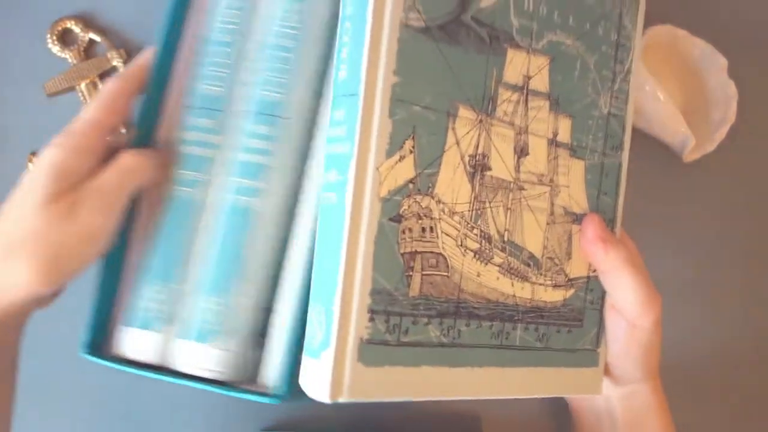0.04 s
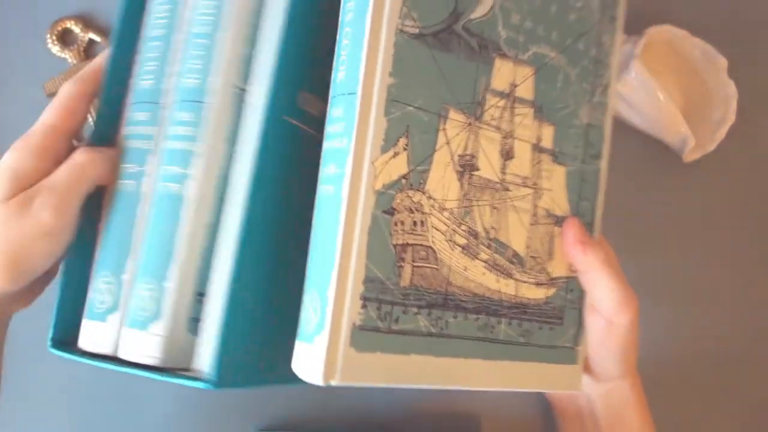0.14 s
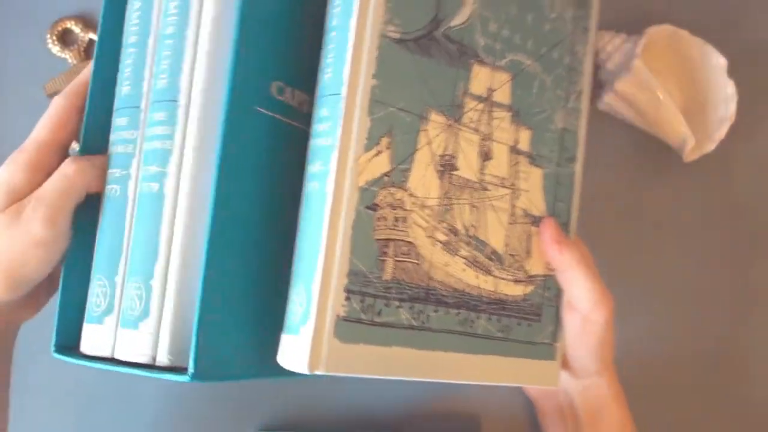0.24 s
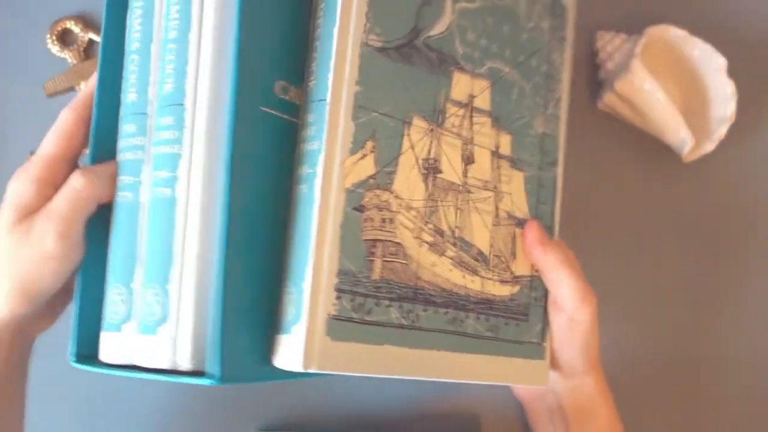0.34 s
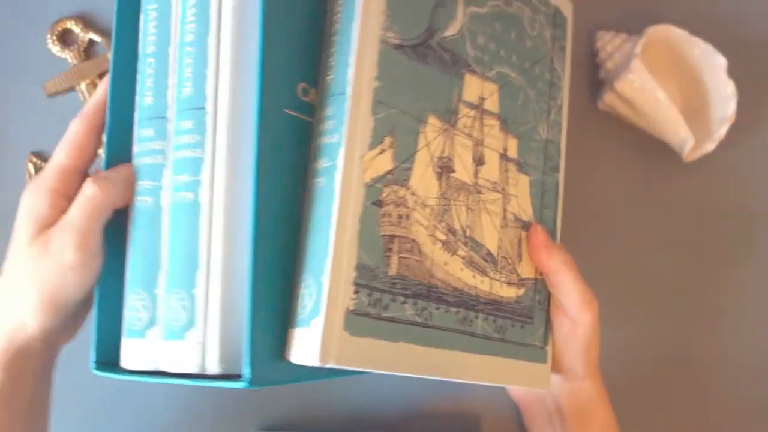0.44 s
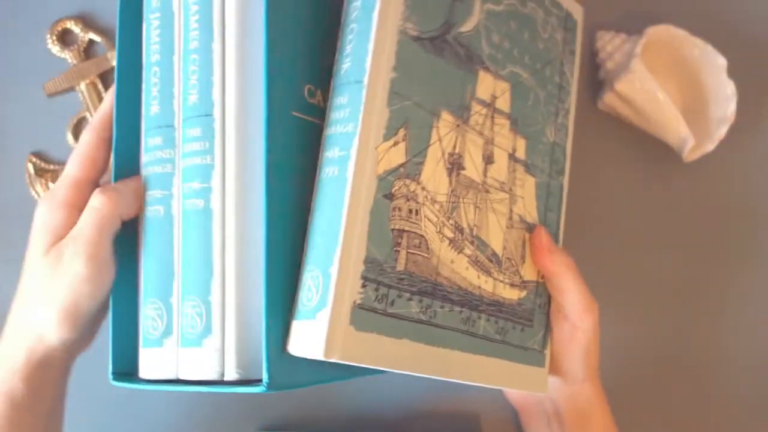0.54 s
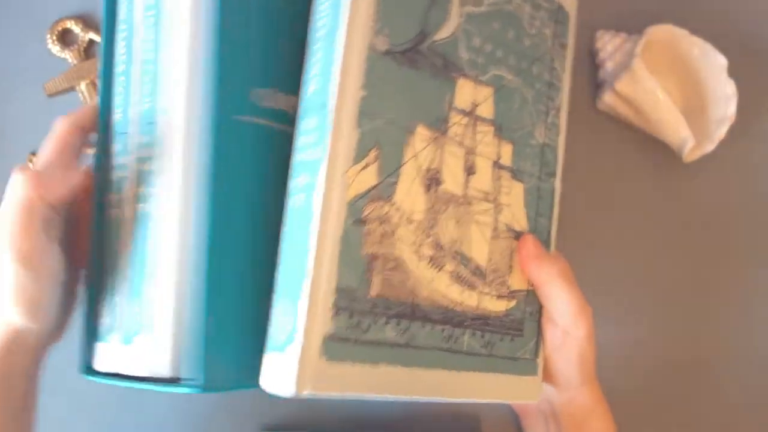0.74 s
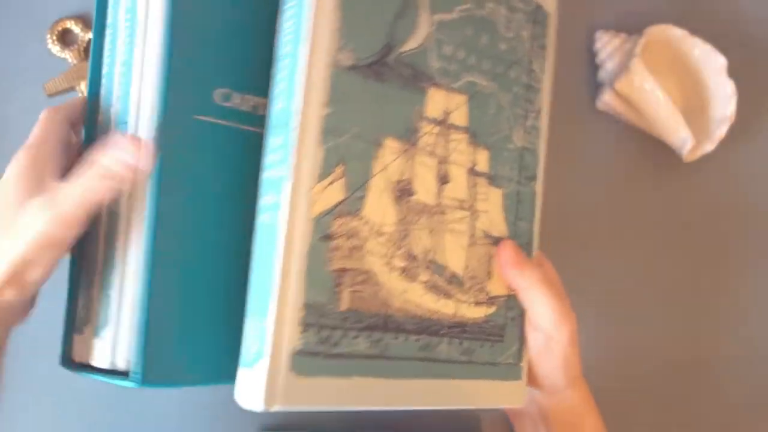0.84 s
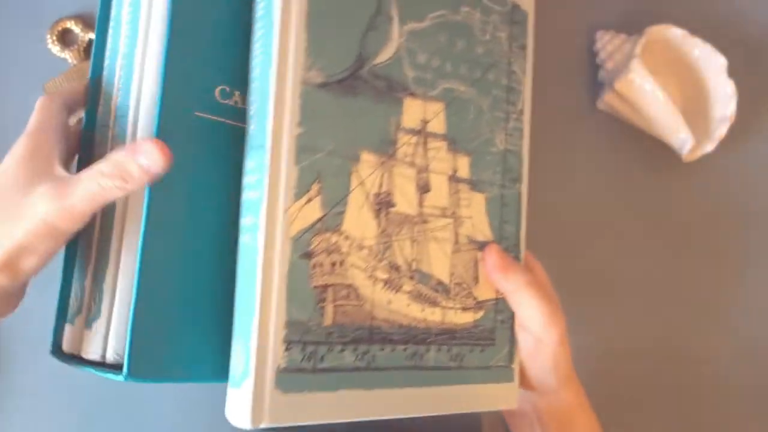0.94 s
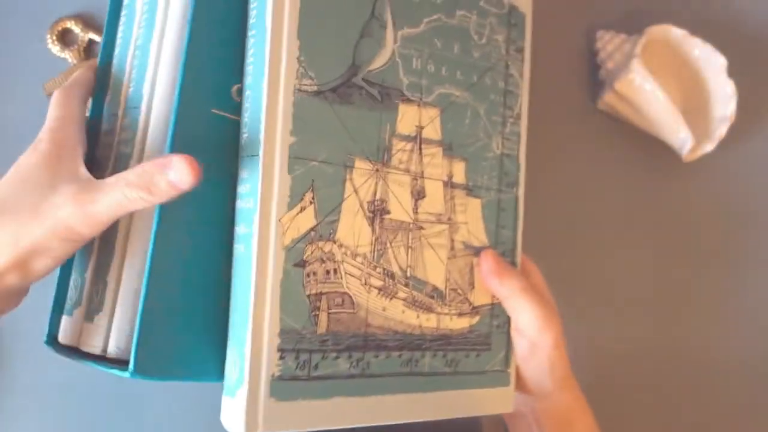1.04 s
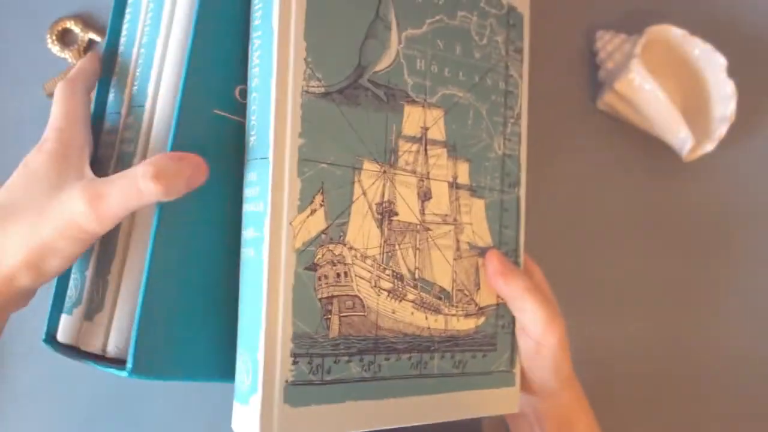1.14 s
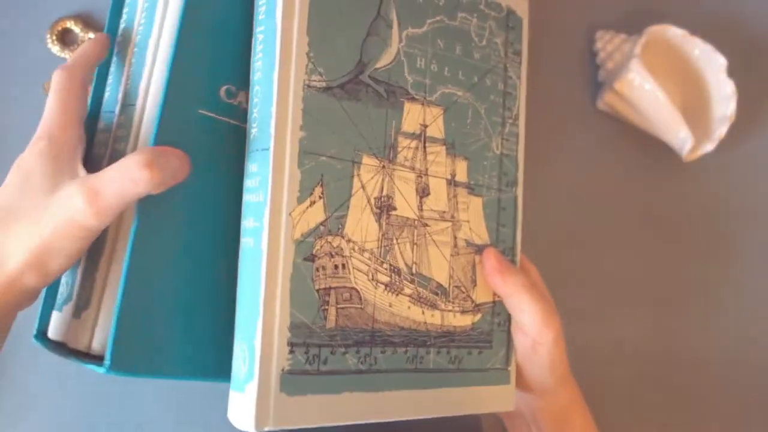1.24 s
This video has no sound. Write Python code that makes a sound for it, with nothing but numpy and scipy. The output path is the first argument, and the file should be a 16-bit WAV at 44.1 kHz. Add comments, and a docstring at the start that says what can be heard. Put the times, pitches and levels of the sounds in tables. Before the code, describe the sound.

Books slide and knock in a cardboard slipcase on a table, with dull thumps.

```python
"""Books slide and tip in a cardboard slipcase that is shifted on a table, in a quiet room.
Stick-slip friction of cloth on card hisses and makes the table rumble. Each impact gives a dull knock
and excites the damped modes of the table top, which sways and booms. A small hard object jingles
faintly, fingertips brush the cloth, and at the end a fingernail ticks on the case."""
import sys
import numpy as np
from scipy import signal
from scipy.fft import rfft, irfft
from scipy.io import wavfile
from scipy.ndimage import uniform_filter1d

SR = 44100
rng = np.random.default_rng(int(sys.argv[2]) if len(sys.argv) > 2 else 0)


def dump_mix(stems):
    """Bounce the given channels to the path in sys.argv[1] as a 16-bit WAV at rate SR."""
    frames = np.atleast_2d(stems).T  # one column per channel
    limited = np.clip(frames, -1, 1)  # hard clip at full scale
    pcm = np.round(limited * 32767).astype(np.int16)
    wavfile.write(sys.argv[1], SR, pcm)


N = 57330
T = np.arange(N) / SR

# impacts of books and case: t/s, knock level/dB, knock f/Hz, crush level/dB, crush tilt/(dB/octave),
# contact time/s, thud level/dB, table boom level/dB, table sway level/dB
IMPACTS = [(0.308, -40, 406, -52.5, 1, 0.0023, -49.5, -20, -14),
           (0.341, -52, 315, -50.5, -0.5, 0.007, -45.5, -45, -22.5),
           (0.677, -28.5, 383.4, -45.5, 2.5, 0.0013, -59, -17.5, -21),
           (0.684, -46.5, 1132, -48, 0.5, 0.001, -50, -28.5, -14),
           (0.709, -48, 560, -55, -2.5, 0.0011, -50.5, -21, -48),
           (0.729, -39.5, 371, -57.5, -2.5, 0.002, -49.5, -42.5, -31),
           (0.853, -48, 835, -42.5, -10.5, 0.001, -59, -31, -41),
           (0.877, -48.5, 772, -44.5, -6, 0.00066, -63, -28, -64),
           (0.916, -45, 469, -48.5, -9, 0.00057, -60.5, -37, -41.5),
           (0.9844, -41, 494, -46.5, -1.5, 0.0005, -48.5, -31.5, -23)]
# friction spectrum of cloth on card: f/Hz, relative level/dB
FRICTION_SPECTRUM = [(150, -30.5), (280, -7.5), (420, 5), (600, -3), (830, -4), (1050, -17.5),
                     (1600, -12.5), (2400, -23), (4500, -23.5), (5000, -32), (7300, -35.5), (9500, -44.5),
                     (16000, -50)]


def sliding():
    """Stick-slip friction: tiny slips of cloth on card hiss in the case and force the table to vibrate."""
    # start t/s, duration/s, rub level/dB, tilt/(dB/octave), rumble level/dB, drone level/dB
    strokes = [(0.039, 0.096, -64, 0, -40, -44.5), (0.111, 0.21, -60, 1, -40.5, -40.5),
               (0.309, 0.12, -61.5, 3, -37.5, -38), (0.422, 0.14, -59, 1, -44.5, -47),
               (0.599, 0.16, -59.5, 1, -42, -47.5), (0.68, 0.18, -67, 2, -36.5, -42),
               (0.833, 0.14, -56.5, -1, -36.5, -36.5), (0.983, 0.062, -56, -1, -33.5, -38.5),
               (1.053, 0.11, -65.5, -4, -42, -50.5), (1.176, 0.3, -67, -1, -57, -55)]
    # forced response of the table top, deep and higher: f/Hz, relative level/dB
    rumble_spectrum = [(15, -27), (32, -6), (55, 8), (74, -1.5), (92, -18), (700, -89)]
    drone_spectrum = [(50, -29), (95, -15.5), (123, 2), (140, -12), (156, -13.5), (190, -32), (900, -88.5)]
    rise_s, fall_s, uneven_db, slip_share = 0.032, 0.07, 0.8, 0.42
    rub, rumble = np.zeros((2, N))
    for start, length, db, tilt_db, rumble_db, drone_db in strokes:
        speed = np.clip((T - start) / rise_s, 0, 1) * np.clip((start + length - T) / fall_s + .5, 0, 1)
        roughness = unit(uniform_filter1d(rng.standard_normal(N), size=700))
        grip = speed * amp(uneven_db * roughness)
        friction = np.sqrt(slip_share) * slips() + np.sqrt(1 - slip_share) * rng.standard_normal(N)
        rub += amp(db) * colour(friction * grip, FRICTION_SPECTRUM, tilt_db)
        rumble += speed * amp(rumble_db) * steady_noise(rumble_spectrum)
        rumble += speed * amp(drone_db) * steady_noise(drone_spectrum)
    return room(rub + rasp() + scuffs(), wet_db=-11.5) + rumble


def rasp():
    """Frequency modulation: narrow resonances of a dragged woven cover rise and sink with its speed."""
    # f/Hz at full speed, width/Hz, level/dB
    weave_bands = [(5570, 300, -77), (6420, 230, -79), (11360, 1300, -88)]
    start_s, length_s, bend = 0.31, 0.26, 0.035
    speed = np.sin(np.pi * np.clip((T - start_s) / length_s, 0, 1))
    glide = 1 + bend * (speed - 1)
    return speed * sum(amp(db) * resonate(slips(), hz * glide, width) for hz, width, db in weave_bands)


def scuffs():
    """Transient friction: the cloth catches in short, gritty bursts of slips."""
    # t/s, level/dB, tilt/(dB/octave)
    catches = [(0.073, -57.5, 1), (0.204, -59.5, 0.5), (0.646, -60, 1)]
    return sum(amp(db) * colour(slips() * gaussian(s, width_s=0.011), FRICTION_SPECTRUM, tilt_db)
               for s, db, tilt_db in catches)


def knocks():
    """Impact excitation: a book knocks the case into ringing, the card crushes and the pages thud."""
    # slipcase: f/Hz, level/dB, T60/s
    case_modes = [(317.3, -16, 0.23), (355.2, -13, 0.19), (430, -15.5, 0.18), (549.3, -9.5, 0.07),
                  (834, -20, 0.14)]
    # crushed card and block of pages: f/Hz, relative level/dB
    crush_spectrum = [(150, -31.5), (350, -3.5), (700, 3), (1150, 0), (3000, -14.5), (8000, -32),
                      (16000, -38)]
    thud_spectrum = [(120, -22.5), (220, -1), (360, 1.5), (520, -11), (900, -23.5), (2500, -55.5)]
    hollow, crush, thud = np.zeros((3, N))
    for s, knock_db, hz, crush_db, tilt_db, contact_s, thud_db, *_ in IMPACTS:
        onset = 1 - np.exp(-T / contact_s)
        # the spot that is hit sets the pitch; the hand damps it
        knock = gaussian(0, width_s=0.011) * np.sin(2 * np.pi * hz * T)
        add(hollow, s, amp(knock_db) * onset * (knock + ring(case_modes, detune=0.011)))
        # a softer contact crushes for longer
        burst = onset * decay(t60=0.031 + 7.1 * contact_s) * rng.standard_normal(N)
        add(crush, s, amp(crush_db) * colour(burst, crush_spectrum, tilt_db))
        add(thud, s, amp(thud_db) * onset * decay(t60=0.32) * steady_noise(thud_spectrum))
    return room(hollow, wet_db=-14) + room(crush, wet_db=-4.5) + thud


def table_top():
    """Modal vibration: after each impact the table's lowest mode sways and the higher ones boom."""
    # f/Hz, level/dB, T60/s, lag/s, rise time/s
    table_modes = [(31.18, -5, 0.55, 0.015, 0.037), (56.9, -1.5, 0.16, 0.01, 0.0089),
                   (113.6, 2, 0.16, 0.0051, 0.0069), (152.5, -11, 0.14, 0.008, 0.018)]
    out = np.zeros(N)
    for k, (hz, db, t60, lag, rise) in enumerate(table_modes):
        swell = 1 - gaussian(0, rise)
        mode = amp(db) * swell * decay(t60) * np.sin(2 * np.pi * hz * T)
        for s, *_, boom_db, sway_db in IMPACTS:
            add(out, s + lag, amp(boom_db if k else sway_db) * mode)
    return out


def fingernail():
    """Impulse response: a nail snaps over the case's edge in ringing ticks, and the room reverberates."""
    # t/s, snap level/dB, ring level/dB
    ticks = [(1.2058, -44, -73), (1.2122, -32.5, -55.5), (1.2141, -35, -65), (1.2242, -41, -65),
             (1.233, -42, -63)]
    # f/Hz, relative level/dB
    snap_spectrum = [(200, -6.5), (2200, -2), (4500, -5.5), (8200, -5), (10300, -20.5), (12000, -12.5),
                     (15500, -14)]
    # f/Hz, level/dB, T60/s
    nail_modes = [(5873, -6, 0.031), (6900, -6, 0.023), (7900, -3, 0.022)]
    out = np.zeros(N)
    for s, snap_db, ring_db in ticks:
        snap = decay(t60=0.0029) * rng.standard_normal(N)
        add(out, s, amp(snap_db) * colour(snap / np.linalg.norm(snap), snap_spectrum))
        add(out, s, amp(ring_db) * ring(nail_modes, detune=0.012))
    tail = decay(t60=0.3) * rng.standard_normal(N)
    return reverberate(out, tail, wet_db=0.5)


def jingle():
    """Contact chatter: jolted by knocks, a small hard object rattles in two high resonances."""
    # t/s, level/dB, T60/s
    rattles = [(0.673, -58, 0.032), (0.985, -67.5, 0.12), (1.024, -76.5, 0.095)]
    # f/Hz, width/Hz, relative level/dB
    resonances = [(7270, 500, -7), (7860, 500, -1.5)]
    out = np.zeros(N)
    for s, db, t60 in rattles:
        chatter = sum(amp(db + part_db) * resonate(slips(), hz, width) for hz, width, part_db in resonances)
        add(out, s, decay(t60) * chatter)
    return room(out, wet_db=-5.5)


def fingertips():
    """Light friction: skin brushes the cloth with a thin, airy hiss."""
    # t/s, level/dB
    brushes = [(0.654, -82.5), (0.806, -84)]
    touch = sum(amp(db) * gaussian(s, width_s=0.03) for s, db in brushes)
    return touch * noise_band(hz=12600, width=4200)


def hush():
    """Ambient noise: the steady, low background of the room."""
    # f/Hz, relative level/dB
    air_spectrum = [(15, -13), (55, 0.5), (200, -13.5), (420, -18.5), (1000, -37), (8000, -47.5),
                    (16000, -62)]
    return amp(-62) * unit(colour(rng.standard_normal(N), air_spectrum))


def room(x, wet_db, gap_s=0.0055):
    """Diffuse reverberation: the treble of the tail dies sooner than the bass."""
    # f/Hz, T60/s
    decay_times = [(150, 0.37), (12000, 0.17)]
    hz, t, bands = signal.stft(rng.standard_normal(N) * (T > gap_s), SR, nperseg=256)
    damping = np.exp(-np.log(1000) * t / read(decay_times, hz)[:, None])
    tail = signal.istft(bands * damping, SR)[1][:N]
    return reverberate(x, tail, wet_db)


def reverberate(x, tail, wet_db):
    """Convolution with a tail of unit energy, added to the direct sound."""
    return x + amp(wet_db) * signal.fftconvolve(x, tail / np.linalg.norm(tail))[:N]


def slips(per_s=2000, spread_db=2.5):
    """Shot noise: randomly timed slips of uneven size, rms 1."""
    sizes = amp(spread_db * np.minimum(rng.exponential(1, N), 4)) * rng.choice([-1, 1], N)
    return unit(sizes * (rng.random(N) < per_s / SR))


def steady_noise(spectrum):
    """Coloured noise held at an even strength by its running rms."""
    noise = colour(rng.standard_normal(N), spectrum)
    return noise / np.sqrt(uniform_filter1d(noise ** 2, size=1800) + 1e-9)


def noise_band(hz, width):
    """Band-pass noise, rms 1."""
    f = np.fft.rfftfreq(N, 1 / SR)
    return unit(irfft(rfft(rng.standard_normal(N)) / (1 + ((f - hz) / (width / 2)) ** 2), N))


def ring(modes, detune):
    """Free vibration of damped modes, slightly retuned by the grip."""
    return sum(amp(db) * decay(t60) * np.sin(2 * np.pi * hz * (1 + detune * rng.standard_normal()) * T)
               for hz, db, t60 in modes)


def resonate(x, hz, width):
    """Driven resonance at a fixed or gliding frequency, rms 1."""
    carrier = np.exp(2j * np.pi * np.cumsum(hz * np.ones(N)) / SR)
    pole = np.exp(-np.pi * width / SR)
    baseband = signal.lfilter([1], np.poly([pole, pole]), x / carrier)
    return unit((carrier * baseband).real)


def colour(x, spectrum, tilt_db=0):
    """Causal filter of unit power, tilted by tilt_db per octave above 500 Hz."""
    hz = abs(np.fft.fftfreq(8192, 1 / SR))
    octaves = np.log2(np.maximum(hz, 500) / 1000)
    gain = unit(amp(read(spectrum, hz) + tilt_db * octaves))
    minimum_phase = np.exp(np.conj(signal.hilbert(np.log(gain + 1e-7))))
    return signal.fftconvolve(x, np.fft.ifft(minimum_phase).real)[:N]


def decay(t60):
    """Exponential decay, 60 dB in t60 seconds."""
    return np.exp(-np.log(1000) * T / t60)


def gaussian(s, width_s):
    """Bell-shaped envelope centred on time s."""
    return np.exp(-((T - s) / width_s) ** 2)


def amp(db):
    """Decibels to gain."""
    return 10 ** (np.asarray(db) / 20)


def unit(x):
    """Scales to rms 1."""
    return x / np.sqrt(np.mean(x ** 2) + 1e-20)


def read(points, hz):
    """Interpolates on a log-frequency axis."""
    f, value = np.transpose(points)
    return np.interp(np.log(hz + 1), np.log(f + 1), value)


def add(mix, s, sound):
    """Mixes a sound in at time s."""
    part = mix[max(round(s * SR), 0):][:len(sound)]
    part += sound[:len(part)]


def scene():
    """Superposition of all sources in one channel."""
    return (sliding() + table_top() + knocks() + jingle() + fingertips() + fingernail() + hush())[None]


def record(dry):
    """Band limiting: a steep low-pass at 15850 Hz."""
    low_pass = signal.firwin(511, 15850, window=("kaiser", 9), fs=SR)
    return signal.oaconvolve(dry, low_pass[None], "same")


dry = scene()
out = record(dry)
dump_mix(out)
```